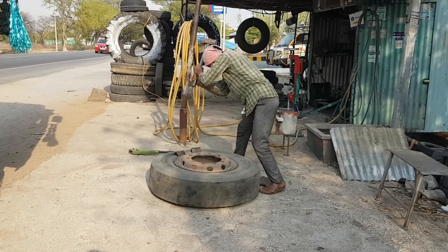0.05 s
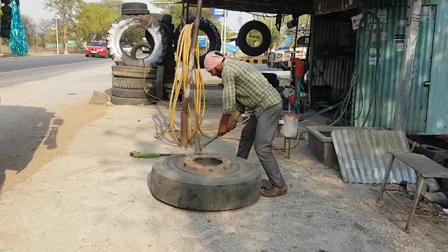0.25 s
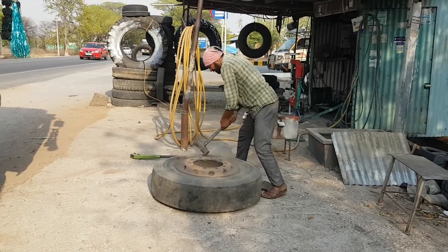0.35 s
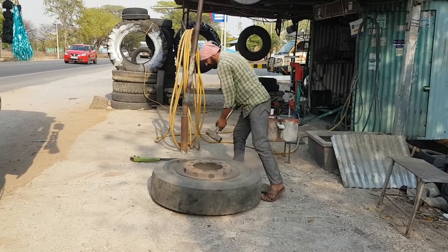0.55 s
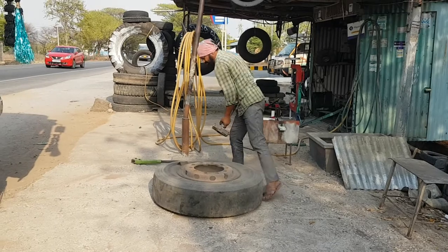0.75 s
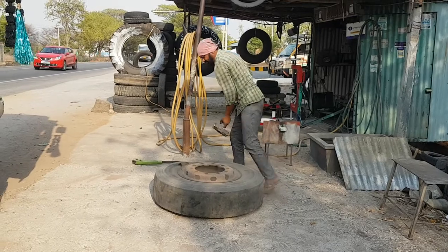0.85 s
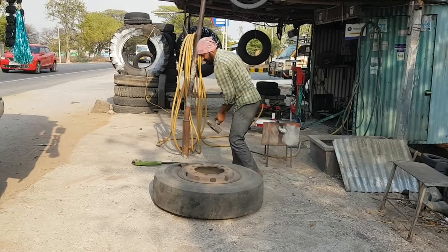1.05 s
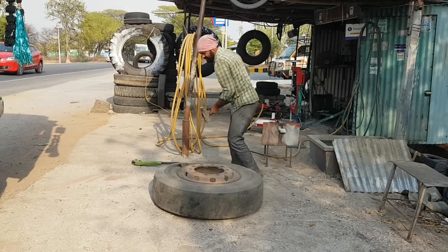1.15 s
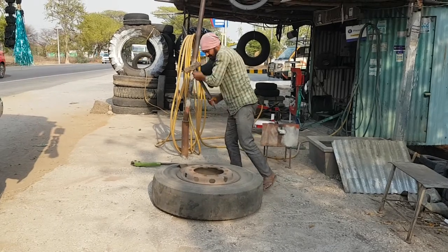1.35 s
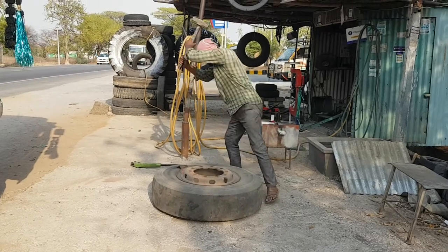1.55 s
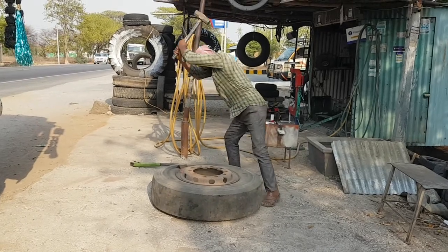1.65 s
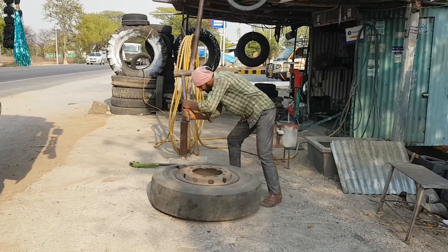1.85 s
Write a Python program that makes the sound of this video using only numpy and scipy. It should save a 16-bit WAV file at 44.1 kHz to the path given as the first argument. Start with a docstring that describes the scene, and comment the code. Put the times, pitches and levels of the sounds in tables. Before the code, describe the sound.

A sledgehammer clangs once on a truck tyre's steel rim as a car approaches.

```python
"""A sledgehammer lands once on the steel rim of a truck tyre lying outside a roadside workshop.
After a soft whoosh the rim clangs, the rubber thumps and the tin shed throws the clang back.
The blow overloads the microphone, whose gain control ducks the road for most of a second.
A car draws near on roaring tyres over rumbling engines and a thin whistle; grit clicks underfoot."""
import sys
import numpy as np
from scipy import signal
from scipy.fft import rfft, irfft
from scipy.io import wavfile
from scipy.ndimage import minimum_filter1d, map_coordinates

SR = 44100
rng = np.random.default_rng(int(sys.argv[2]) if len(sys.argv) > 2 else 0)


def inscribe(sig):
    """Save sig as 16-bit PCM at rate SR to the path in sys.argv[1].

    A 1-D sig is mono; a 2-D sig holds one channel per row.
    Samples are clipped to [-1, 1] before scaling.
    """
    pcm = np.round(np.clip(np.atleast_2d(sig).T, -1, 1) * 32767)
    wavfile.write(sys.argv[1], SR, pcm.astype(np.int16))


N = 83790
TIME = np.arange(N) / SR
BIN_HZ = np.maximum(np.fft.rfftfreq(N, 1 / SR), 1)
BLOW_S, HARD_ATTACK_S = .2435, .0004


def from_db(db):
    """Decibels to gain."""
    return 10 ** (np.asarray(db) / 20)


def automation(rows):
    """One lane per column of a time table, ramped between its breakpoints."""
    times, *columns = np.transpose(rows)
    return [np.interp(TIME, times, column) for column in columns]


def over_bins(rows):
    """A frequency curve at every bin, drawn on a log-frequency axis."""
    hz, values = np.transpose(rows)
    return np.interp(np.log(BIN_HZ), np.log(hz), values)


def struck(start_s, attack_s, t60_s):
    """Percussive envelope: a quick rise, then an exponential decay."""
    age = np.maximum(TIME - start_s, 0)
    return (1 - np.exp(-age / attack_s)) * np.exp(-np.minimum(np.log(1000) * age / t60_s, 50))


# EQ of the brighter right microphone: f/Hz, level/dB
RIGHT_EQ = [(200, -1), (1200, 1), (2300, 1.5), (3300, 4), (4300, 8), (5200, 10), (7000, 11.5), (8300, 2.5),
            (9500, -2.5), (11000, 3.5), (14000, -4)]
# Stereo image of the ambience and of the blow: f/Hz, left-right correlation
AMBIENCE_IMAGE = [(60, 0.91), (300, 1), (800, 0.57), (1500, 0.35), (3000, 0.1), (7000, .15), (15000, .1)]
BLOW_IMAGE = [(60, .1), (200, 0.58), (600, .3), (1400, -0.32), (5000, 0.044), (15000, 0)]
def noise(spectrum, image=AMBIENCE_IMAGE):
    """Mid-side noise shaped to a spectrum, brighter on the right."""
    mid, side = rfft(rng.standard_normal((2, N)))
    correlation = over_bins(image)
    mid, side = mid * np.sqrt(1 + correlation), side * np.sqrt(1 - correlation)
    pair = np.array([mid + side, (mid - side) * from_db(over_bins(RIGHT_EQ))])
    return irfft(pair * from_db(over_bins(spectrum)), N) * np.sqrt(SR) / 2


# Tyre roar, and the close-up hiss and body rumble: f/Hz, level/dB per Hz at unity fader
ROAR_SPECTRUM = [(100, -88), (290, -68.5), (440, -74), (620, -79), (740, -66.5), (850, -59.5), (960, -64.5),
                 (1090, -65), (1350, -75), (1600, -77), (1900, -71.5), (2250, -77.5), (2700, -78.5),
                 (3400, -89.5), (4300, -93), (5400, -98.5), (7200, -101), (8800, -113), (11000, -109),
                 (15500, -112)]
CLOSE_SPECTRUM = [(30, -77), (64, -67), (100, -71.5), (150, -76), (300, -66.5), (550, -71.5), (1200, -78),
                  (2300, -84.5), (3500, -89), (5200, -95), (7200, -98.5), (8800, -108), (11000, -103),
                  (15500, -108)]
# Roar fader and position: t/s, level/dB, left lead/samples
ROAR_RIDE = [(0, -6.5, 9.6), (.25, -6.5, 5.1), (.6, -5, 7.7), (.9, -1, 8.2), (1.1, 0.5, 11.4),
             (1.3, -1.5, 10.9), (1.5, 0.5, 11), (1.7, 1, 13.9), (1.9, 1.5, 20.7)]
# Close-up fader: t/s, level/dB
CLOSE_RIDE = [(0, -19.5), (.85, -16), (1.05, -7), (1.3, -9), (1.6, -3), (1.8, 3), (1.9, 0)]
def car():
    """A car rolls closer and drifts left; its hiss and rumble grow faster than its roar."""
    roar_db, lead = automation(ROAR_RIDE)
    roar = from_db(roar_db) * noise(ROAR_SPECTRUM)
    close = from_db(automation(CLOSE_RIDE)[0]) * noise(CLOSE_SPECTRUM)
    left, right = roar + close
    left = map_coordinates(left, [np.arange(N) + lead], order=3, mode="mirror")
    return np.array([left, right])


# Engine rumble: f/Hz, level/dB per Hz at unity fader
RUMBLE_SPECTRUM = [(25, -83), (45, -76.5), (64, -64.5), (95, -66.5), (140, -65.5), (200, -61.5), (300, -71),
                   (500, -79.5), (1000, -91), (4000, -110), (12000, -130)]
# Rumble fader: t/s, level/dB
RUMBLE_RIDE = [(0, 0), (.22, 0), (.5, -0.5), (.75, -9), (1.2, -15.5), (1.9, -8)]
def engines():
    """Engines on the road blur into a low bed of noise."""
    return from_db(automation(RUMBLE_RIDE)[0]) * noise(RUMBLE_SPECTRUM)


# Drone fader: t/s, level/dB
DRONE_RIDE = [(0, -51.5), (.5, -49.5), (.8, -54.5), (1.3, -55), (1.7, -48), (1.9, -43)]
def drone(firing_hz=63.3):
    """The firing note of an engine down the road."""
    return from_db(automation(DRONE_RIDE)[0]) * np.sin(2 * np.pi * firing_hz * TIME)


# Whistle fader: t/s, level/dB
WHISTLE_RIDE = [(0, -104), (.6, -97), (1.0, -86), (1.35, -89.5), (1.55, -104), (1.9, -110)]
def whistle(centre_hz=4830, width_hz=200):
    """A narrow band of hiss that comes and goes as the car approaches."""
    resonance = signal.iirpeak(centre_hz, centre_hz / width_hz, fs=SR)
    hiss = signal.lfilter(*resonance, noise([(1, 0), (SR, 0)]))
    return hiss * from_db(automation(WHISTLE_RIDE)[0])


# Dark whoosh of air: f/Hz, level/dB per Hz before the trim
WHOOSH_SPECTRUM = [(30, -60), (150, -55.5), (300, -57.5), (700, -72.5), (3000, -100), (15000, -130)]
def swing(trim_db=-4.5, swell_s=.02):
    """Air pushed aside by the hammer swells up to the blow and falls away."""
    return noise(WHOOSH_SPECTRUM) * from_db(trim_db) * np.exp(-np.abs(TIME - BLOW_S) / swell_s)


def ring(modes, attack_s, widest_hz=3078):
    """Struck modes as decaying sines; higher ones differ more in phase between left and right."""
    sides = np.array([[.5], [-.5]])
    out = 0
    for (hz, db, t60, pan_db), (phase, skew) in zip(modes, rng.random((len(modes), 2))):
        spread = sides * (skew - .5) * min(hz / widest_hz, 1)
        tone = np.sin(2 * np.pi * (hz * TIME + phase + spread))
        out += from_db(db + pan_db * sides) * struck(BLOW_S, attack_s, t60) * tone
    return out


# The wheel's crowd of close modes: f/Hz, level/dB per Hz before the trims, t60/s
CLANG_BANDS = [(40.04, -40, 0.29), (140, -32, 0.34), (304, -34.5, 0.23), (570, -37.5, 0.16),
               (1200, -34.5, .2), (1750, -30, .18), (2200, -27, .225), (3154, -35, .21), (7110, -40, 0.25),
               (9000, -47, .21), (11250, -47, 0.23), (11400, -34, 0.19), (11900, -51.5, .14),
               (15500, -46.5, .125)]
CLANG_SPECTRUM = [(hz, db) for hz, db, _ in CLANG_BANDS]
def clang(attack_s, trim_db, delay_s=0):
    """Close modes merge into noise, each band dying at its own rate from the moment of the blow."""
    wash = rfft(noise(CLANG_SPECTRUM, BLOW_IMAGE))
    centres_hz, _, t60s = np.transpose(CLANG_BANDS)
    out = 0
    for t60, solo in zip(t60s, np.eye(len(t60s))):
        band = irfft(wash * np.interp(np.log(BIN_HZ), np.log(centres_hz), solo), N)
        decayed_db = 60 * delay_s / t60
        out += band * from_db(trim_db - decayed_db) * struck(BLOW_S + delay_s, attack_s, t60)
    return out


# The rim's clearest modes: f/Hz, level/dB, t60/s, left over right/dB
STEEL_MODES = [(1330, -20, 0.36, 3.5), (1579, -7.5, 0.17, -0.5), (1750, -6, 0.15, -6.5),
               (1965, -11, .16, -0.5), (2157, -16.5, 0.41, -4.5), (2171, -12, 0.13, -3),
               (2243, -14.5, 0.43, -6.5), (2480, -7, .18, -2.5), (2805, -3.5, 0.19, -7.5),
               (4310, -18, .24, -6.5), (5725, -12.5, 0.16, -9.5), (5862, -12.5, 0.16, -9.5),
               (6142, -12.5, 0.17, -12), (6592, -8.5, 0.28, -10), (6925, -9.5, 0.26, -8.5),
               (7660, -11.5, .21, -9.5), (8156, -18.5, .2, 1.5), (11180, -8, .14, 4)]
def rim():
    """Steel on steel: clear partials ring over a noisy clang."""
    return clang(HARD_ATTACK_S, trim_db=-1) + ring(STEEL_MODES, HARD_ATTACK_S)


# Rubber carcass and the air inside: f/Hz, level/dB, t60/s, left over right/dB
THUMP_MODES = [(39.96, -3, 0.077, 13.5), (77.1, -7.5, .12, 2), (132, -11, .13, -0.5),
               (180, -6.5, 0.17, -0.5), (235, -5, 0.096, 8), (305, -7.5, .08, 4.5), (385.2, -4, 0.055, 7.5),
               (559.4, 3, 0.074, 0), (960, -6, 0.1, 0.5)]
# Crunch of the contact: f/Hz, level/dB per Hz
CRUNCH_SPECTRUM = [(20, -26.5), (90, -32.5), (250, -31.5), (550, -28.5), (1500, -33), (4000, -46.5),
                   (9000, -51.5), (15000, -47.5)]
def tyre():
    """The rubber gives, so its thump has a softer attack than the crunch of contact."""
    thump = ring(THUMP_MODES, attack_s=.005)
    crunch = noise(CRUNCH_SPECTRUM, BLOW_IMAGE) * struck(BLOW_S, HARD_ATTACK_S, t60_s=.075)
    return thump + crunch


def shed_echo(delay_s=.029, attack_s=.0045, tail_db=-25.5, damping_hz=6805):
    """The tin shed scatters the clang back, and the yard adds a duller tail."""
    slap = clang(attack_s, trim_db=1, delay_s=delay_s)
    damping = signal.butter(2, damping_hz, fs=SR, output="sos")
    tail = signal.sosfilt(damping, noise(CLANG_SPECTRUM, BLOW_IMAGE))
    return slap + tail * from_db(tail_db) * struck(BLOW_S + delay_s, attack_s, t60_s=.65)


# Grit underfoot: t/s, level/dB before the low cut
GRIT_CLICKS = [(1.017, -54), (1.179, -56), (1.2595, -45), (1.864, -49)]
def grit(low_cut_hz=9000):
    """Tiny bright clicks as the feet shift."""
    envelope = sum(from_db(db) * struck(t, HARD_ATTACK_S, t60_s=.014) for t, db in GRIT_CLICKS)
    low_cut = signal.butter(2, low_cut_hz, "high", fs=SR, output="sos")
    return signal.sosfilt(low_cut, envelope * rng.standard_normal((2, N)))


def scene():
    """One hammer blow over the roadside bed."""
    road = car() + engines() + drone() + whistle()
    return road + swing() + rim() + tyre() + shed_echo() + grit()


def gain_control(x, threshold_db=-16, range_db=14, attack_s=.009, hold_s=.5, release_db_per_s=37):
    """Loud sound pulls the gain down; it holds, then climbs back steadily."""
    peak_db = 20 * np.log10(np.abs(x).max(axis=0) + 1e-9)
    over_db = np.clip(peak_db - threshold_db, 0, range_db)
    hold = int(hold_s * SR)
    held_db = -minimum_filter1d(-over_db, size=hold, origin=(hold - 1) // 2, mode="constant")
    climb_db = release_db_per_s * TIME
    duck_db = np.maximum.accumulate(held_db + climb_db) - climb_db
    pole = np.exp(-1 / (attack_s * SR))
    return x * from_db(-signal.lfilter([1 - pole], [1, -pole], duck_db))


def record(dry, ceiling=.95, high_cut_hz=15900):
    """The gain control is too slow for the transient, which soft-clips; a steep filter cuts the top."""
    drive = gain_control(dry) / ceiling
    clipped = ceiling * drive / (1 + drive ** 4) ** .25
    return signal.sosfilt(signal.ellip(10, .1, 60, high_cut_hz, fs=SR, output="sos"), clipped)


dry = scene()
out = record(dry)
inscribe(out)
```